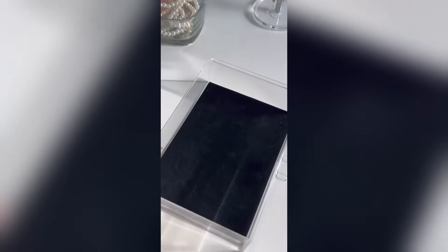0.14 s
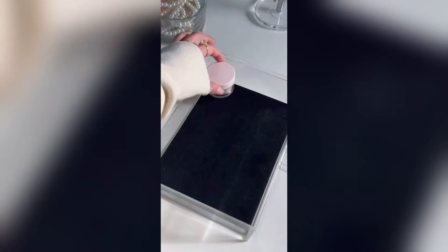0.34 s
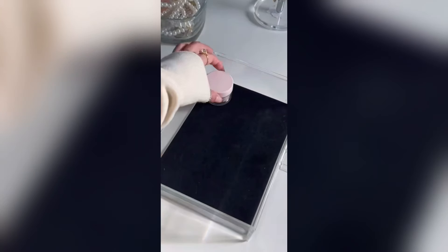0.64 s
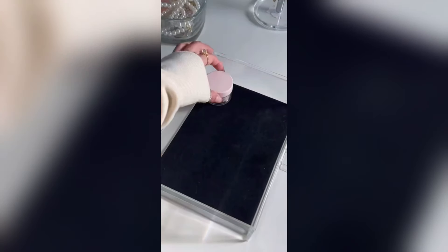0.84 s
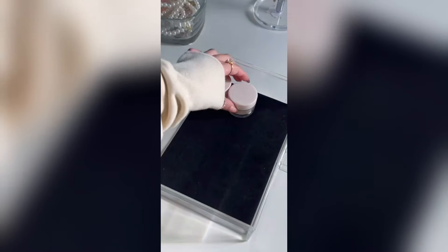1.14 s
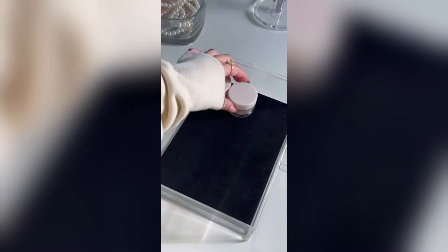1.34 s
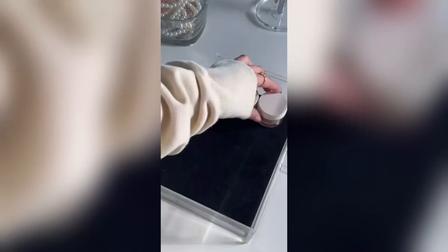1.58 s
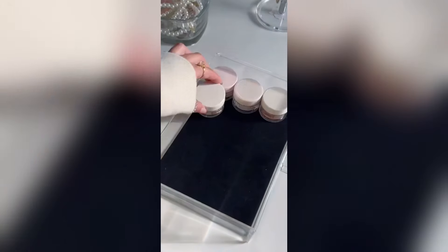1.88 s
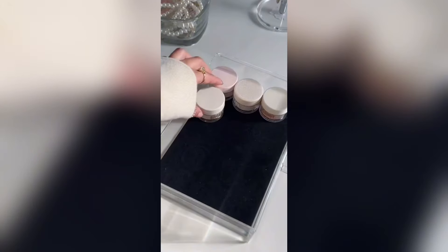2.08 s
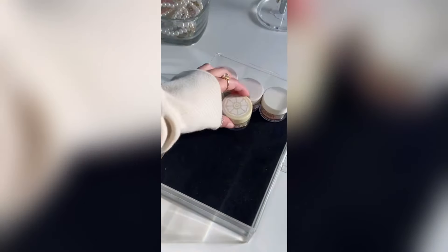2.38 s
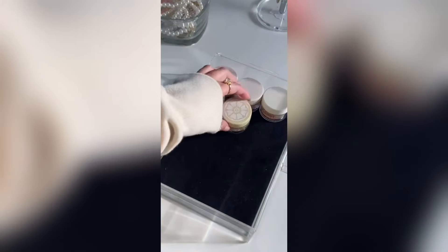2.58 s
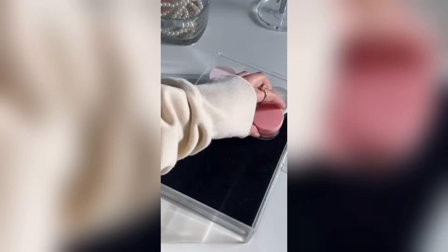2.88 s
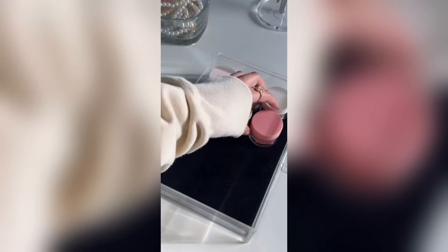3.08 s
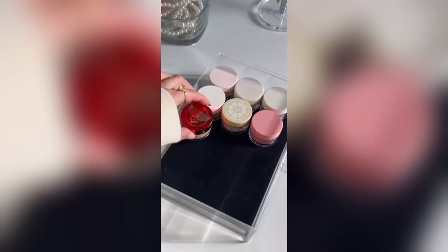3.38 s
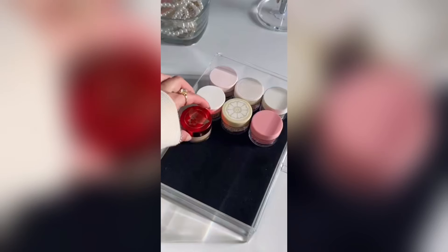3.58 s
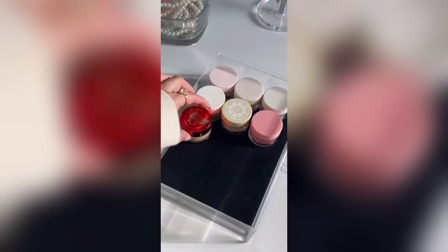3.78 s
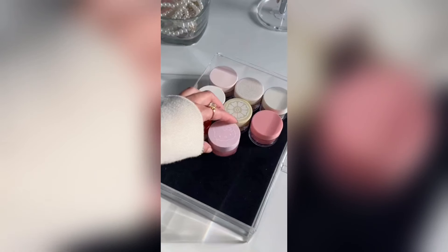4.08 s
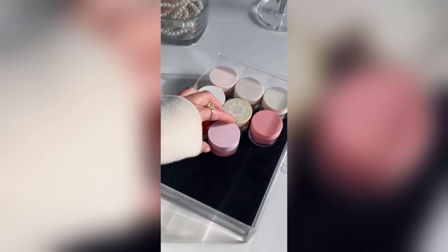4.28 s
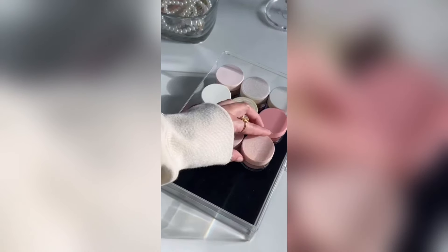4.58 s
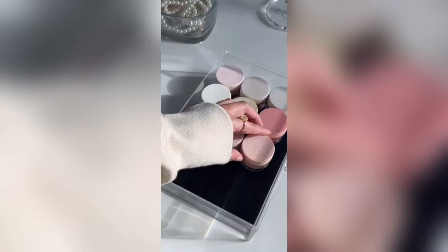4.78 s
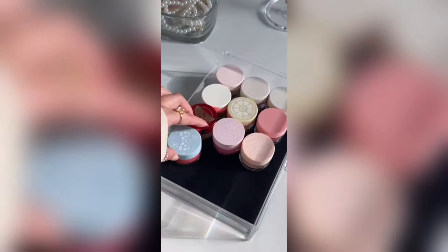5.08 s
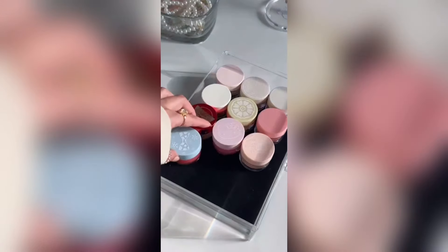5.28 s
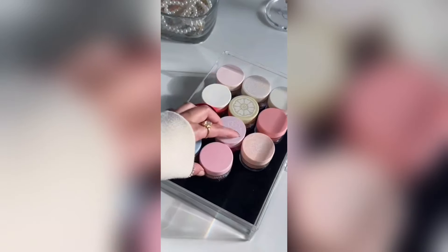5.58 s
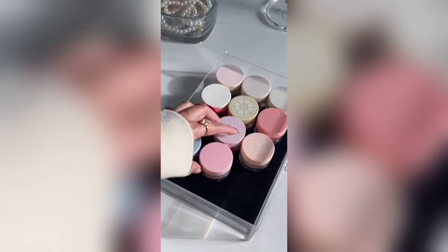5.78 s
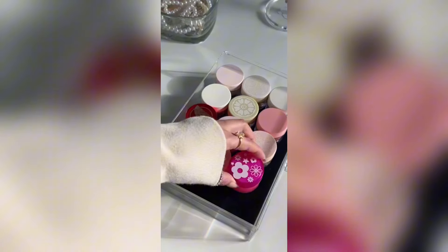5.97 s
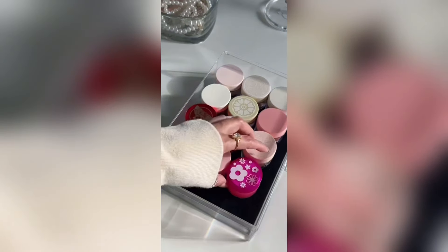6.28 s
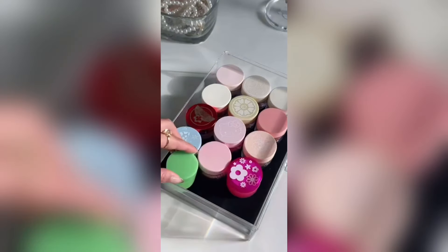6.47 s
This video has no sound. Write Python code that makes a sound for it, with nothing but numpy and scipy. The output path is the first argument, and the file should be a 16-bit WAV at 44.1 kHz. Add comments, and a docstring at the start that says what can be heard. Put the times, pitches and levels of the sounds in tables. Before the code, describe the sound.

Close, dry-sounding plastic handling in a small room: a short burst of rushing noise, then about a dozen jar placements, roughly two per second. Knocks start boxy and resonant in the empty tray, then grow more damped as it fills. Rims click and scrape slightly, and the low room hum drops out abruptly between each short passage.

```python
"""On a desk in a small room, plastic cosmetic jars are set one by one into a lined acrylic tray, close up.
Jars tick and scrape against their neighbours, then land and settle: ringing modes, noise clicks, tiny grains.
Tray and desk are banks of damped modes, answered by a room of decaying noise; later landings knock the tray less.
A drone and hiss lie underneath. The sound comes in short passages with near-silence between, the first a rush."""
import sys
import numpy as np
from scipy import signal
from scipy.fft import rfft, irfft, next_fast_len
from scipy.io import wavfile

SR = 44100
rng = np.random.default_rng(int(sys.argv[2]) if len(sys.argv) > 2 else 0)


def waveform_to_disk(signal):
    """Save audio, clipped to [-1, 1], as 16-bit WAV at the path in sys.argv[1]."""
    frames = np.transpose(np.atleast_2d(signal))
    scaled = np.clip(frames, -1, 1) * 32767
    samples = np.round(scaled).astype(np.int16)
    wavfile.write(sys.argv[1], SR, samples)


N = 292815

# A jar's base meeting the tray, again if it tilts or rocks.
# Each row: start in seconds, strength in dB, contact cut-off in Hz, jar ring in Hz,
# desk thump in dB, click in dB.
JAR_LANDINGS = [ (0.453, -37, 950, 668, -32, -57.5), (0.946, -47, 1350, 1248, -41, -56.5),
                (1.3232, -33, 1707, 669, -32, -53), (1.834, -34.5, 1700, 1290, -37, -49.5),
                (2.484, -44, 394, 472, -34.5, -65.5), (2.496, -35.5, 950, 637, -33, -52.5),
                (2.7846, -58.5, 1940, 1390, -50, -54.5), (2.798, -35.5, 1550, 783, -31.5, -51.5),
                (3.3397, -50, 3030, 1460, -52.5, -44.5), (3.35, -37.5, 970, 520, -34, -46),
                (3.381, -42.5, 1210, 440, -38, -51.5), (3.9111, -32, 1010, 500, -28, -44),
                (4.3496, -36.5, 2200, 892, -31, -51.5), (4.361, -38, 900, 475, -34.5, -58),
                (4.893, -29, 1440, 793, -34, -71), (4.904, -33.5, 1020, 560, -44.5, -64),
                (5.4247, -33, 940, 783, -29, -50.5), (5.8997, -38.5, 1804, 1140, -27.5, -50.5),
                (5.909, -30.5, 790, 367, -33.5, -55.5), (6.4313, -28, 2740, 1230, -39, -48),
                (6.444, -35, 3000, 804, -39.5, -41)]
# Jar rims touching. Each row: start in seconds, strength in dB, shell ring in Hz, rim ring in Hz,
# sharpness as the click over the ring in dB.
RIM_TICKS = [(0.454, -31.5, 1219, 2520, -25), (1.021, -62, 2626, 3800, -20), (1.32, -30.5, 1370, 2420, -24),
             (1.324, -28.5, 1392, 4594, -29.5), (1.796, -63, 2366, 5890, -31),
             (1.8355, -42.5, 2436, 3340, -25.5), (1.871, -54, 1460, 3320, -10),
             (2.469, -55.5, 2810, 6860, -4), (2.851, -61, 1680, 3270, 0), (3.302, -67, 1475, 2150, -9),
             (3.311, -65, 2120, 5600, -15.5), (3.3396, -40, 2083, 3400, 2), (3.895, -62.5, 2820, 7060, 3),
             (3.912, -35.5, 1290, 2750, -21), (4.354, -50.5, 2473, 3200, -21),
             (4.849, -39, 1776, 5240, -22.5), (4.884, -47.5, 2470, 5970, -13),
             (4.889, -51.5, 2500, 6000, -2.5), (4.907, -43.5, 1705, 5760, -40),
             (5.383, -73, 1240, 7000, -12), (5.872, -74, 1576, 7140, 7), (5.9, -50, 1860, 6840, -18),
             (6.3819, -35.5, 1296, 4830, -6), (6.4255, -42.5, 1750, 5500, 7.5),
             (6.433, -30, 1788, 3560, -8), (6.444, -44, 1800, 4370, 4.5)]
# A jar sliding along its neighbours. Each row: start in seconds, end in seconds, level in dB.
JAR_SCRAPES = [(2.48, 2.49, -64), (3.3, 3.33, -67.5), (3.882, 3.908, -70.5), (4.354, 4.4, -56.5),
               (4.86, 4.935, -55), (5.381, 5.44, -76), (6.385, 6.42, -70.5), (6.424, 6.473, -53)]
# Passages of sound, one jar in each after the first. Each row: start in seconds, end in seconds.
PASSAGES = [(0, 0.241), (0.385, 0.778), (0.94, 1.258), (1.31, 1.649), (1.779, 2.187), (2.24, 2.657),
            (2.78, 3.191), (3.222, 3.692), (3.82, 4.204), (4.343, 4.712), (4.841, 5.255), (5.342, 5.727),
            (5.871, 6.195), (6.337, 6.706)]
# Background level in each passage: one value per passage, in dB.
PASSAGE_FLOOR_DB = [4, 0.5, -1, -1, 2, 1, -1, 0.5, 2.5, -1.5, 0.5, 1, 2, 1.5]

# Modes of the acrylic tray. Each row: frequency in Hz, level in dB, t60 in seconds.
TRAY_MODES = [(238, -12, 0.065), (315.8, -5.5, 0.09), (374.6, -1.5, .06), (481.2, 0.5, 0.031),
              (583, 3, 0.021), (761.5, 1, 0.028), (852.4, -0.5, 0.018), (1091, 3, 0.011), (1255, -4, 0.02),
              (1395, -4, 0.021), (1750, -6.5, 0.019), (1995, -11, 0.018), (2257, -8, 0.013),
              (2650, -4.5, 0.0076), (3080, -9.5, 0.017), (3620, -12.5, .02), (4400, -14.5, 0.012),
              (5250, -19.5, .015), (6200, -23, .015)]
# Modes of the desk under it. Each row: frequency in Hz, level in dB, t60 in seconds.
DESK_MODES = [(62, -18.5, 0.42), (111.9, -6, 0.18), (174.7, -0.5, 0.18), (210.2, 5.5, 0.067),
              (262.4, -0.5, 0.1)]
# Modes of a jar's shell. Each row: multiple of its ring pitch, level in dB, t60 in seconds at SHELL_HZ.
SHELL_MODES = [(.61, -13, .02), (.74, -2, .02), (.87, 4, .025), (1, 8, .04), (1.14, 1, .025),
               (1.33, -2, .02), (1.54, -9.5, 0.023), (1.83, -19.5, .015), (2.2, -19.5, .015),
               (2.75, -20.5, .012), (3.3, -24, .012)]
# Modes of a jar's stiff rim. Each row: multiple of its ring pitch, level in dB, t60 in seconds.
RIM_MODES = [(.82, -7, .01), (1, 0, 0.016), (1.12, -9.5, 0.01), (1.34, -6.5, 0.009)]

# Colour of plastic on plastic. Each row: frequency in Hz, relative level in dB per Hz.
CLICK_SPECTRUM = [(300, -19), (1500, 16.5), (3300, 0.5), (5000, -6.5), (7000, -6.5), (9000, -9.5),
                  (11000, -17), (13500, -9), (16000, -17)]
# Colour of the room's low drone. Each row: frequency in Hz, relative level in dB per Hz.
RUMBLE_SPECTRUM = [(15, -40.5), (25, -14), (123, -1.5), (242, -8), (344, -9.5), (405, -21.5), (476, -21.5),
                   (531, -23.5), (695, -21.5), (1160, -32.5), (2350, -37), (10400, -50.5), (13600, -52),
                   (14800, -50), (16000, -68)]
# Colour of the airy hiss. Each row: frequency in Hz, relative level in dB per Hz.
HISS_SPECTRUM = [(180, -29), (300, 10), (372, -15), (412, -20.5), (603, -1.5), (1120, -8), (1210, -5.5),
                 (1930, -9), (3400, -13.5), (4370, -16.5), (11900, -29.5), (13800, -20.5), (16000, -35.5)]
# Colour of the broad rush in the opening passage. Each row: frequency in Hz, relative level in dB per Hz.
RUSH_SPECTRUM = [(290, -29), (500, -3), (1110, -8.5), (1210, 0.5), (1530, -12), (3390, -12.5),
                 (4400, -20.5), (16000, -30)]
# Narrow bands of the drone. Each row: frequency in Hz, level against the rumble in dB.
HUM_BANDS = [(136, -3), (228, -5), (479, -16.5)]
# Decay of the room's answer. Each row: frequency in Hz, t60 in seconds.
ROOM_DECAY = [(100, 0.33), (260, 0.28), (700, 0.27), (1800, .27), (5000, 0.27), (13000, 0.17)]

T = np.arange(SR // 2) / SR  # seconds within one blow
TOP_HZ = 15900  # band limit
SPOT_DB = 1.5  # spread of mode strengths from blow to blow
EMPTY_TRAY_DB, DAMPING_DB_PER_S = 17, 3.0  # tray knock over jar ring at time 0; it fades as the jars pile in
SETTLE_DB, SETTLE_T60_S = -7, 0.25  # chatter of a jar coming to rest, against its click
PUSH_DB = -5  # the part of a tick that reaches the tray
RIM_DB, RIM_PER_SHARPNESS = -10, 0.31  # rim against shell; a sharper touch rings it more (dB per dB)
SHELL_HZ, SHELL_DAMPING = 1120, 0.27  # in ticks, shells above this pitch die sooner, by this power
TRAY_ROOM_DB, JAR_ROOM_DB = -3.5, -5  # the room's answer to landings
RUMBLE_DB, HISS_DB, RUSH_DB = -57, -74.5, -58  # rumble and hiss before the passage level


def amp(db):
    """Decibels to gain."""
    return 10 ** (np.asarray(db) / 20)


def unit(x):
    """Scale to rms 1."""
    return x / np.sqrt(np.mean(x ** 2) + 1e-20)


def burst(x):
    """Scale a blow to the energy of 10 ms at rms 1."""
    return x / np.sqrt(np.sum(x ** 2) / (SR / 100) + 1e-20)


def along(points, hz):
    """Read a curve of (Hz, value) points on a log frequency axis."""
    point_hz, values = np.transpose(points)
    return np.interp(np.log(hz + 1), np.log(point_hz), values)


def filtered(x, response):
    """Shape a sound by a complex response of frequency."""
    size = next_fast_len(len(x) + 8192)
    hz = np.fft.rfftfreq(size, 1 / SR)
    return irfft(rfft(x, size) * response(hz), size)[:len(x)]


def coloured(x, spectrum):
    """Give a signal a spectrum's colour, at rms 1."""
    return unit(filtered(x, lambda hz: amp(along(spectrum, hz))))


def noise(spectrum, size):
    """Coloured noise of rms 1."""
    return coloured(rng.standard_normal(size), spectrum)


def add(track, start, x):
    """Mix a sound into the track from a time in seconds."""
    part = track[max(round(start * SR), 0):][:len(x)]
    part += x[:len(part)]


def in_room(x, room_db, build=0.0053):
    """A sound plus the room's answer, which builds up and then dies at its own speed in each band."""
    hz, t, bands = signal.stft(rng.standard_normal(len(T)), SR, nperseg=256)
    decay = amp(-60 * t / along(ROOM_DECAY, hz)[:, None])
    tail = signal.istft(bands * decay, SR, nperseg=256)[1][:len(T)]
    tail = tail * (1 - np.exp(-(T / build) ** 2))
    answer = signal.fftconvolve(x, tail / np.linalg.norm(tail))[:len(x)]
    return x + amp(room_db) * answer


def background(hum_width_hz=7):
    """The room's low drone and airy hiss, at a level set for each passage; a noise rush in the first."""
    t = np.arange(N) / SR
    ends = np.transpose(PASSAGES)[1]
    drone = noise(RUMBLE_SPECTRUM, N)
    for hum_hz, db in HUM_BANDS:
        band = filtered(rng.standard_normal(N), lambda hz: 1 / (1 + ((hz - hum_hz) / hum_width_hz) ** 2))
        drone = drone + amp(db) * unit(band)
    floor = amp(RUMBLE_DB) * unit(drone) + amp(HISS_DB) * noise(HISS_SPECTRUM, N)
    passage_gain = amp(PASSAGE_FLOOR_DB)[np.searchsorted(ends, t)]
    rush = amp(RUSH_DB) * (t < ends[0]) * noise(RUSH_SPECTRUM, N)
    return passage_gain * floor + rush


def slips(per_s):
    """Plastic catching and slipping on plastic in tiny random grains, rms 1."""
    grains = (rng.random(len(T)) < per_s / SR) * rng.standard_normal(len(T))
    return coloured(grains, CLICK_SPECTRUM)


def scrapes():
    """Sliding plastic catches and slips in tiny grains, faded in and out over each stroke."""
    out = np.zeros(N)
    for start, end, db in JAR_SCRAPES:
        stroke = np.clip(np.minimum(T, end - start - T) / 0.0094, 0, 1)
        add(out, start, in_room(amp(db) * slips(per_s=1200) * stroke, room_db=0.5))
    return out


def ring(modes, attack, pitch=1):
    """Damped modes of alternating sign; their strengths change a little with the spot that is struck."""
    out = np.zeros(len(T))
    for k, (hz, db, t60) in enumerate(modes):
        strength = amp(db + SPOT_DB * rng.normal() - 60 * T / t60)
        out += (-1) ** k * strength * np.sin(2 * np.pi * hz * pitch * T)
    return out * (1 - np.exp(-T / attack))


def click(t60):
    """The crack of hard plastic meeting plastic: a burst of noise with a fast onset and a decay."""
    onset = 1 - np.exp(-T / 0.0004)
    return burst(noise(CLICK_SPECTRUM, len(T)) * amp(-60 * T / t60) * onset)


def shell_ring(hz, attack):
    """A jar's shell ringing at a pitch; the higher it is, the sooner it dies."""
    life = (SHELL_HZ / hz) ** SHELL_DAMPING
    modes = [(multiple, db, t60 * life) for multiple, db, t60 in SHELL_MODES]
    return burst(ring(modes, attack, pitch=hz))


def ticks():
    """Rim against rim: the shells and their edges ring, and a little of the push reaches the tray."""
    out = np.zeros(N)
    for start, db, shell_hz, rim_hz, sharp_db in RIM_TICKS:
        shell = shell_ring(shell_hz, attack=0.00069)
        rim_gain = amp(RIM_DB + RIM_PER_SHARPNESS * sharp_db)
        rim = rim_gain * burst(ring(RIM_MODES, attack=0.0003, pitch=rim_hz))
        tray = amp(PUSH_DB) * burst(ring(TRAY_MODES, attack=0.003))
        crack = amp(sharp_db) * click(t60=0.06)
        add(out, start, amp(db) * in_room(shell + rim + tray + crack, room_db=-9.5))
    return out


def landings():
    """A jar's base strikes tray and desk, then chatters to rest; a softer contact reaches fewer high modes."""
    out = np.zeros(N)
    for start, db, contact_hz, jar_hz, desk_db, click_db in JAR_LANDINGS:
        # the contact is a damped second-order low-pass
        soft = lambda hz: 1 / (1 + 1.4j * hz / contact_hz - (hz / contact_hz) ** 2)
        tray_gain = amp(db + EMPTY_TRAY_DB - DAMPING_DB_PER_S * start)
        tray = tray_gain * burst(filtered(ring(TRAY_MODES, attack=0.0006), soft))
        desk = amp(desk_db) * burst(ring(DESK_MODES, attack=0.0052))
        # in a landing the shell's decay times do not depend on its pitch
        jar = amp(db) * burst(ring(SHELL_MODES, attack=0.0011, pitch=jar_hz))
        chatter = amp(SETTLE_DB - 60 * T / SETTLE_T60_S) * slips(per_s=900)
        crack = amp(click_db) * (click(t60=0.025) + chatter)
        add(out, start, in_room(tray, TRAY_ROOM_DB))
        add(out, start, in_room(jar, JAR_ROOM_DB))
        add(out, start, in_room(crack, room_db=-7))
        add(out, start, in_room(desk, room_db=-2))
    return out


def scene():
    """Room, scrapes, ticks and landings summed to one channel."""
    return (background() + scrapes() + ticks() + landings())[None]


def record(dry):
    """Full level during the passages, 44.5 dB down between them, and nothing above the band limit."""
    t = np.arange(N) / SR
    heard = np.zeros(N)
    for start, end in PASSAGES:
        heard += np.clip(np.minimum((t - start) / 0.0036, (end - t) / 0.0072), 0, 1)  # short fades
    gated = dry[0] * np.maximum(heard, amp(-44.5))
    return filtered(gated, lambda hz: hz < TOP_HZ)[None]


dry = scene()
out = record(dry)
waveform_to_disk(out)
```